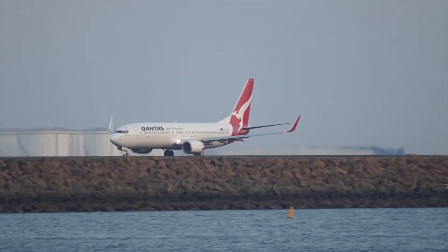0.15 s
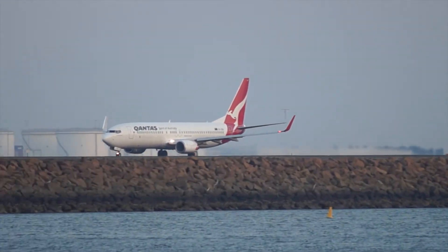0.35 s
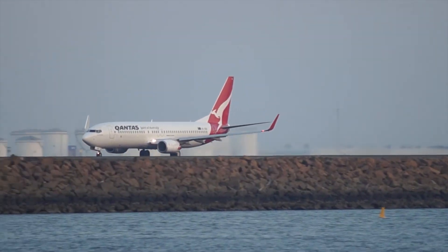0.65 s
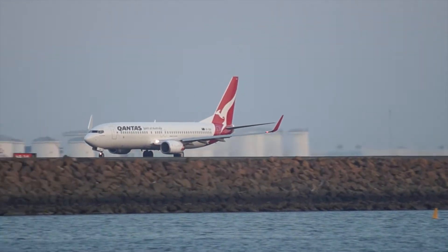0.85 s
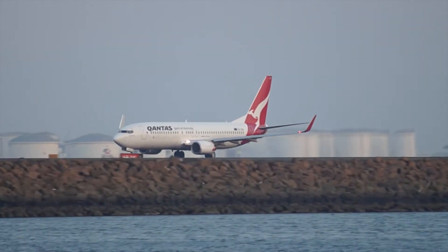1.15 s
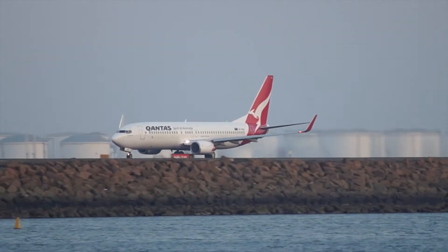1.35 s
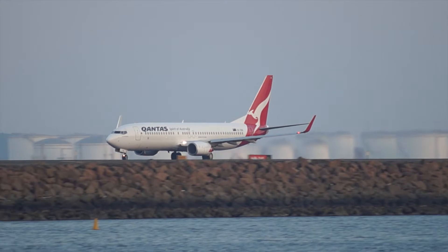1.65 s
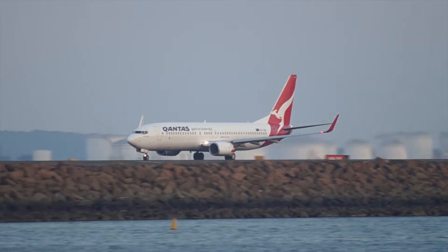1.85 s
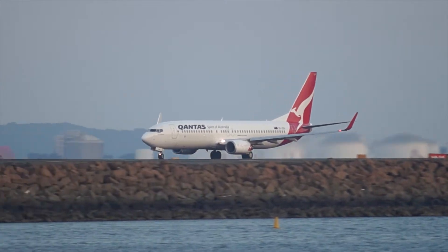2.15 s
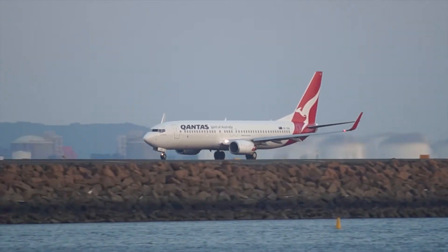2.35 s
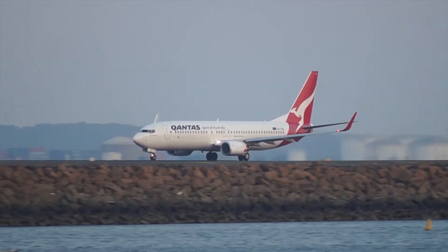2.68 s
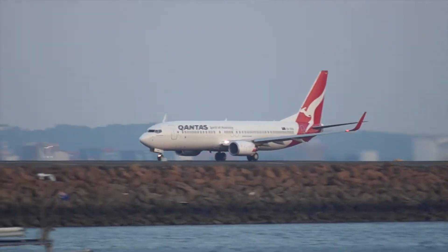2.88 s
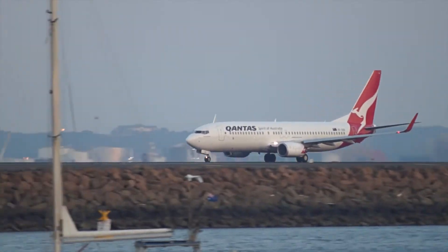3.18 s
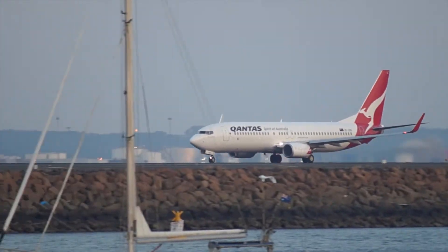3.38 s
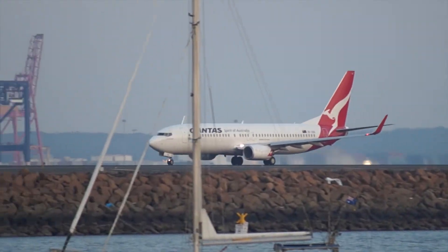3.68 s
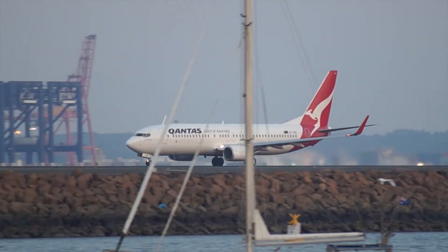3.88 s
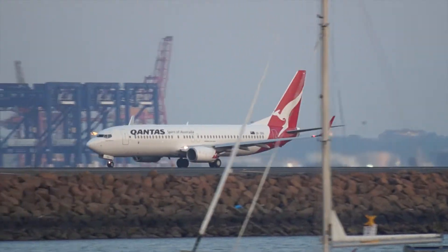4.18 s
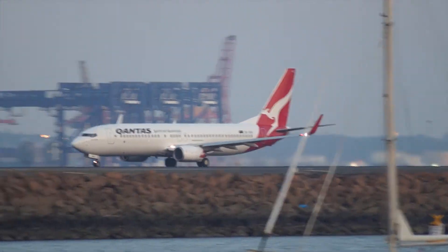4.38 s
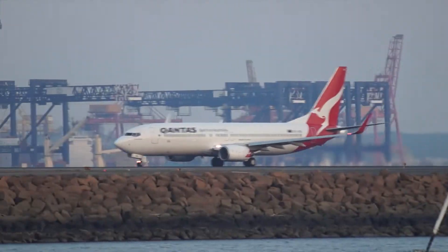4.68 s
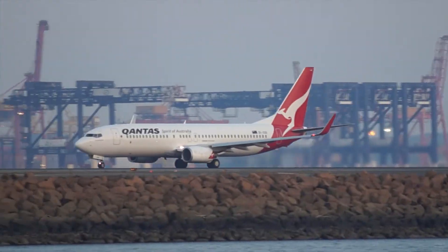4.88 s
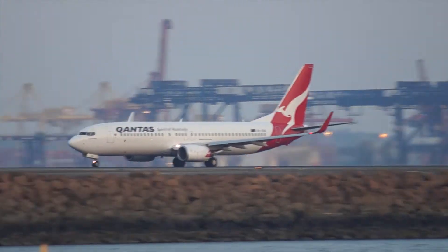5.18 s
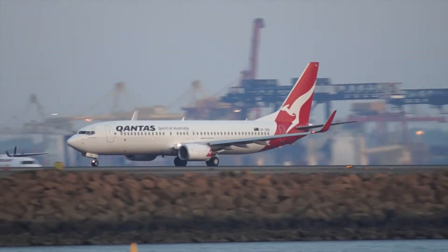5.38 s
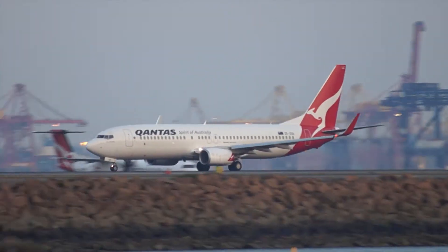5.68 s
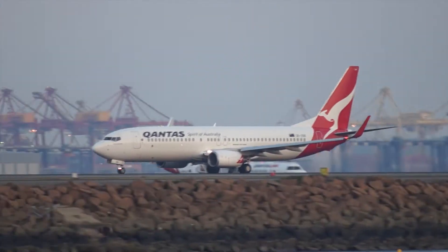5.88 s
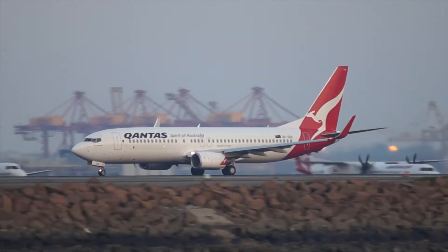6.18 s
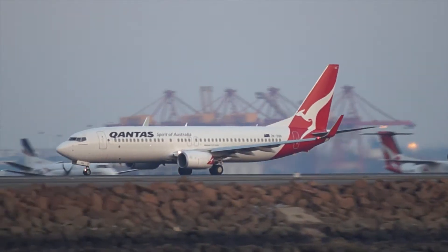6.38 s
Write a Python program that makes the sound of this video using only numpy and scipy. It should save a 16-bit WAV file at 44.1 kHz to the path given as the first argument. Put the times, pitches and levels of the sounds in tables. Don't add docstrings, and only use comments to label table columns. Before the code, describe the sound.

Far-off jet takeoff roll: soft wide roar, thumping low rumble growing stronger in gusts, with a thin glinting whine and buzz from the engines.

```python
import sys
import numpy as np
from scipy import signal
from scipy.fft import rfft, irfft
from scipy.io import wavfile
from scipy.ndimage import uniform_filter1d, map_coordinates

SR = 44100
rng = np.random.default_rng(int(sys.argv[2]) if len(sys.argv) > 2 else 0)


def elevation(decibels):
    levels = np.asarray(decibels, float)
    return 10 ** (levels / 20)


def generate_wav(sig):
    pcm = np.round(np.clip(np.atleast_2d(sig).T, -1, 1) * 32767).astype(np.int16)
    wavfile.write(sys.argv[1], SR, pcm)


N = 288414
TIME = np.arange(N) / SR
HZ = np.fft.rfftfreq(N, 1 / SR)

# start_s, level_db
RUMBLE_LEVEL = [(0.0, -42), (0.62, -38.5), (1.04, -35.5), (1.82, -38.5), (2.26, -33), (3.28, -31.5),
                (3.9, -27), (5.19, -23.5), (5.34, -27.5), (5.54, -33.5), (6.36, -27.5), (6.54, -28)]
# peak_s, peak_db, length_s
GUSTS = [(0.147, -33.5, 0.15), (0.442, -38.5, 0.31), (0.77, -33, 0.028), (0.94, -33.5, 0.091),
         (2.078, -30, 0.11), (2.256, -30, .1), (2.37, -29, .1), (2.873, -25, 0.052), (2.977, -32.5, 0.16),
         (3.322, -27, 0.14), (3.74, -23, 0.071), (3.864, -26, 0.04), (4, -21.5, 0.13), (4.275, -24, 0.072),
         (4.414, -24, .12), (4.598, -24, 0.049), (4.72, -16.5, 0.097), (5.113, -24, 0.11),
         (5.223, -24.5, 0.083), (5.327, -19, 0.039), (5.554, -25.5, .07), (5.641, -25.5, 0.11),
         (5.825, -29, 0.15), (6.1, -27, .07), (6.268, -26, 0.061), (6.425, -24, 0.11)]
# frequency_hz, density_db (per Hz)
RUMBLE_COLOUR = [(8.8, -40), (15, -6.5), (43, 0.5), (70, -1), (119, -6), (228, -15.5), (300, -37.5),
                 (353, -18.5), (400, -54), (520, -62), (880, -120)]
# start_s, level_db, brightness_db
ROAR_LEVEL = [(0.0, -39, -14), (0.27, -38, -16), (1.07, -38.5, -15), (2.31, -34.5, -14.5), (2.8, -36, -15),
              (3.17, -35.5, -12), (3.31, -36.5, -15), (3.73, -34.5, -14), (3.77, -34, -14),
              (4.28, -36, -13.5), (4.44, -37.5, -13), (4.66, -35.5, -12.5), (4.68, -37, -12),
              (4.75, -37.5, -15), (4.97, -36, -13.5), (5.94, -36, -13.5), (6.36, -34, -12),
              (6.54, -35, -11.5)]
# frequency_hz, density_db (per Hz)
ROAR_COLOUR = [(120, 0.5), (250, 2), (500, -1), (1000, -1.5), (1500, -6.5), (2000, -10), (2600, -13.5),
               (3300, -19), (4000, -23), (5000, -34), (6500, -49), (9000, -68)]
# start_s, level_db
FAN_LEVEL = [(0.0, -57.5), (1.58, -48), (1.64, -51.5), (2.33, -46), (2.46, -40), (2.48, -49.5), (3.77, -46),
             (3.88, -37), (4.21, -46), (4.99, -46), (5.01, -48), (5.63, -50), (6.41, -51), (6.54, -44)]
# peak_s, peak_db, length_s
GLINTS = [(1.236, -47, 0.054), (1.81, -43, 0.059), (1.93, -45, 0.041), (2.13, -48, .06),
          (2.453, -35.5, 0.029), (2.8, -42, .08), (2.91, -48, .04), (3, -44, 0.062), (3.498, -40, 0.034),
          (3.833, -48, .04), (3.886, -43, .05), (3.993, -34.5, 0.051), (4.17, -41, .06), (4.3, -45, 0.037),
          (4.41, -48, .07), (4.717, -43, .05), (5.027, -39, 0.038), (5.13, -40.5, 0.11), (5.27, -47, .05),
          (5.45, -47, .1), (5.59, -49, 0.091), (5.81, -48, 0.064), (5.93, -42, 0.043), (6.1, -42, .1),
          (6.223, -47, .07), (6.352, -45.5, .09)]
# start_s, whining_fan_hz, buzzing_fan_hz
BLADE_RATES = [(0, 2200, 2222), (1.2, 2210, 2226), (2.4, 2229, 2232), (3.9, 2240, 2238), (6.54, 2236, 2236)]
# shaft_multiple (of shaft rate), level_db
BUZZ_PARTIALS = [(13, -14), (14, -0.5), (15, -3), (16, -3), (17, 1.5), (18, -8.5), (19, -18), (32, -12)]
# frequency_hz, side_minus_mid_db
MIC_WIDTH = [(60, -18.5), (110, -13.5), (200, -10.5), (380, -8), (700, -3), (1290, 1), (2380, 6),
             (4400, 3.5), (8120, 13), (15000, 20)]


def level(x, db):
    return x * elevation(db) / np.sqrt(np.mean(x ** 2))


def columns(table):
    s, *rest = np.transpose(table)
    return [np.interp(TIME, s, c) for c in rest]


def colour(table, hz):
    f, value = np.transpose(table)
    return np.interp(np.log(np.maximum(hz, 1)), np.log(f), value)


def walk(rate_hz):
    hold = int(SR / rate_hz)
    steps = np.repeat(rng.standard_normal(N // 200), hold)[:N]
    return 1.42 * uniform_filter1d(uniform_filter1d(steps, hold), hold)


def swells(base_db, events):
    power = elevation(2 * base_db)
    for peak_s, peak_db, length_s in events:
        power = power + elevation(2 * peak_db) * np.exp(-0.5 * ((TIME - peak_s) / (0.34 * length_s)) ** 2)
    return 10 * np.log10(power)


def microphone_pair(mid, other, lean, lead, narrow_db=0):
    diffuse = np.sqrt(np.maximum(1 - lean ** 2 - lead ** 2, 0))
    side = lean * mid + 1j * lead * mid + diffuse * other
    side = side * elevation(colour(MIC_WIDTH, HZ) + narrow_db)
    return irfft(np.array([mid + side, mid - side]), N)


def turbulence(table, low_hz, count, tilt_db, knee_hz, shared_db, own_db, rate_hz, lean, lead):
    mid, other = rfft(rng.standard_normal((2, N))) * elevation(colour(table, HZ))
    out, shared = 0, walk(rate_hz / 3)
    for k in range(count):
        away = np.clip(2 * np.log2(np.maximum(HZ, 1) / low_hz) - k, -1, 1)
        shape = np.cos(np.pi / 2 * away)
        band = microphone_pair(mid * shape, other * shape, lean, lead)
        bright = np.clip(np.log2(low_hz * 2 ** (k / 2) / knee_hz), 0, 1)
        out = out + band * elevation(bright * tilt_db + shared_db * shared + own_db * walk(rate_hz))
    return out / np.std(out.mean(axis=0))


def rumble():
    db = swells(columns(RUMBLE_LEVEL)[0] - 1.5, GUSTS)
    gust_darken = 0.19
    air = turbulence(RUMBLE_COLOUR, low_hz=16.86, count=11, tilt_db=-gust_darken * (db - db.mean()),
                     knee_hz=100, shared_db=1.24, own_db=0.77, rate_hz=24, lean=0, lead=-0.51)
    pan_db = 2.1 + 0.5 * walk(12)
    return air * elevation(db + np.array([pan_db, -pan_db]) / 2)


def roar():
    db, bright_db = columns(ROAR_LEVEL)
    lead = np.interp(HZ, [500, 1100], [-0.6, -0.33])
    air = turbulence(ROAR_COLOUR, low_hz=119.7, count=13, tilt_db=bright_db - bright_db.mean(),
                     knee_hz=1260, shared_db=-0.31, own_db=-0.08, rate_hz=14, lean=-0.34, lead=lead)
    return air * elevation(db + 1.5)


def tone(hz, smear_hz, steady):
    turn = np.exp(2j * np.pi * np.cumsum(hz) / SR)

    def scattered():
        return np.real(turn * (steady + walk(smear_hz) + 1j * walk(smear_hz)))

    mid, other = rfft(scattered()), rfft(scattered())
    return level(microphone_pair(mid, other, lean=0.11, lead=-0.6, narrow_db=-6.5), 0)


def whine(blade_hz, slow_db):
    db = swells(slow_db - 2 + 0.3 * walk(26.24), GLINTS)
    wandering_hz = blade_hz + 5.47 * walk(12)
    return tone(wandering_hz, smear_hz=95.3, steady=0.97) * elevation(db - 0.5)


def buzz(blade_hz, slow_db):
    roar_db = columns(ROAR_LEVEL)[0]
    db = -53.5 + 0.63 * (slow_db - slow_db.mean()) + 0.74 * (roar_db - roar_db.mean())
    shaft_hz = blade_hz / 24
    partials = sum(elevation(partial_db) * tone(shaft_hz * multiple, smear_hz=55.04, steady=0.36)
                   for multiple, partial_db in BUZZ_PARTIALS)
    return partials * elevation(db + 0.9 * walk(14))


def fans():
    whining_hz, buzzing_hz = columns(BLADE_RATES)
    slow_db = columns(FAN_LEVEL)[0]
    return whine(whining_hz, slow_db) + buzz(buzzing_hz, slow_db)


def scene():
    return rumble() + roar() + fans()


def low_pass(x):
    return signal.sosfilt(signal.butter(12, 15772, fs=SR, output="sos"), x)


def record(dry):
    mirror_hz, scan_hz = 3900.23, 15625.0
    slip = 1.8 * ((TIME * mirror_hz) % 1 - 0.5)
    read = np.array([map_coordinates(c, [np.arange(N) + slip], order=3, mode="nearest") for c in dry])
    scan = elevation(-86) * np.sin(2 * np.pi * scan_hz * TIME)
    scan_mirror = elevation(-76) * np.sin(2 * np.pi * (scan_hz - mirror_hz) * TIME)
    hiss = elevation(-77) * rng.standard_normal((2, N))
    return low_pass(read + scan_mirror + scan + hiss)


dry = scene()
out = record(dry)
generate_wav(out)
```